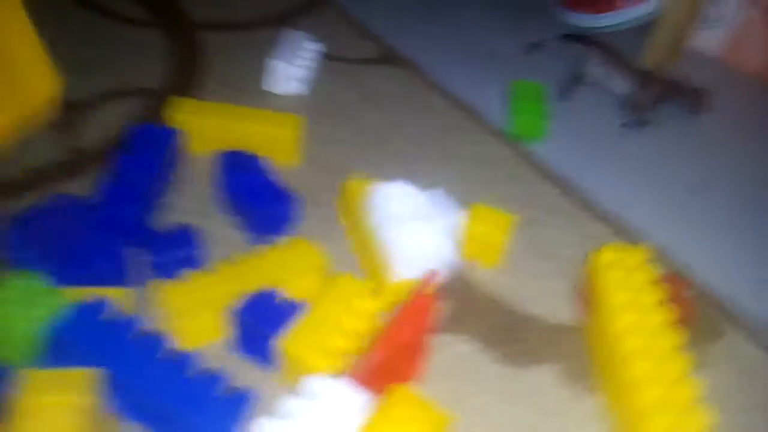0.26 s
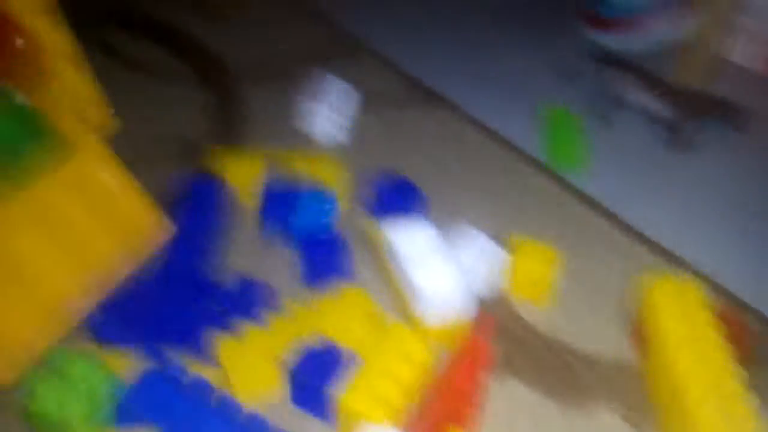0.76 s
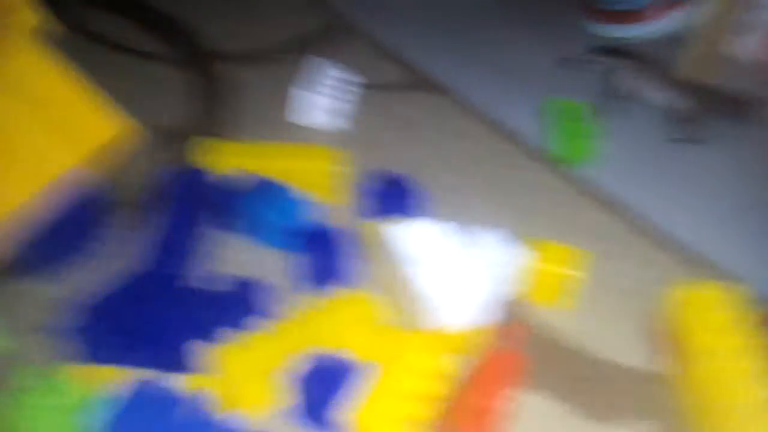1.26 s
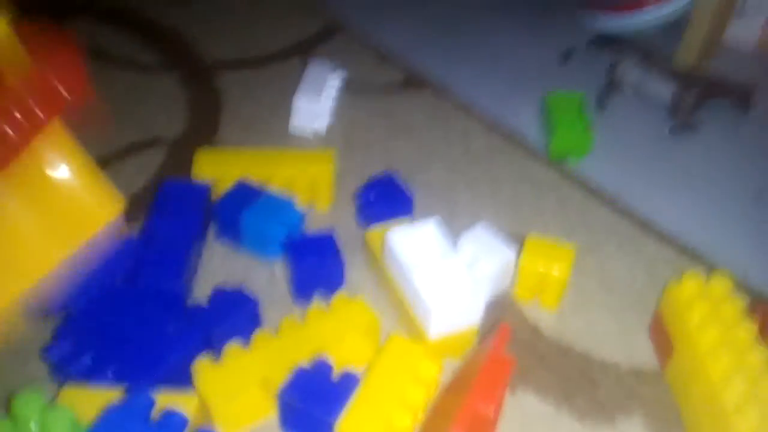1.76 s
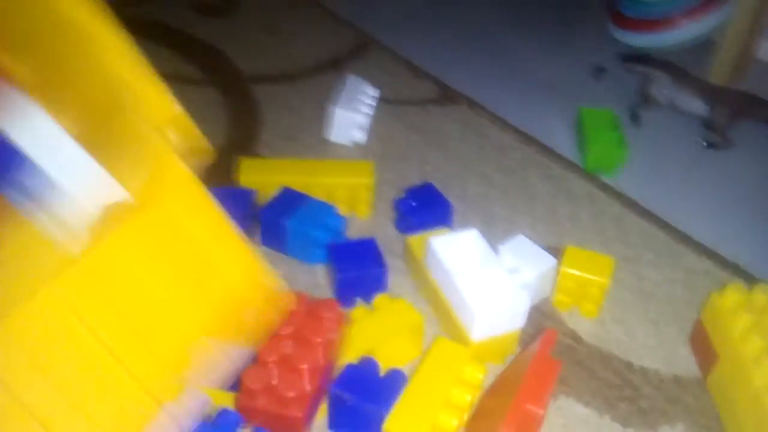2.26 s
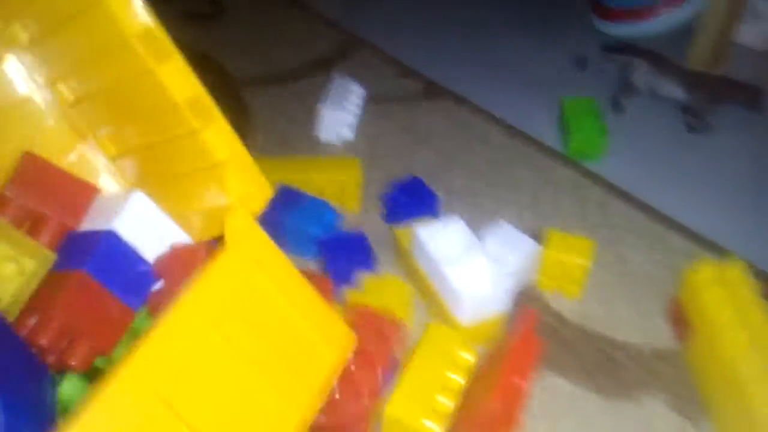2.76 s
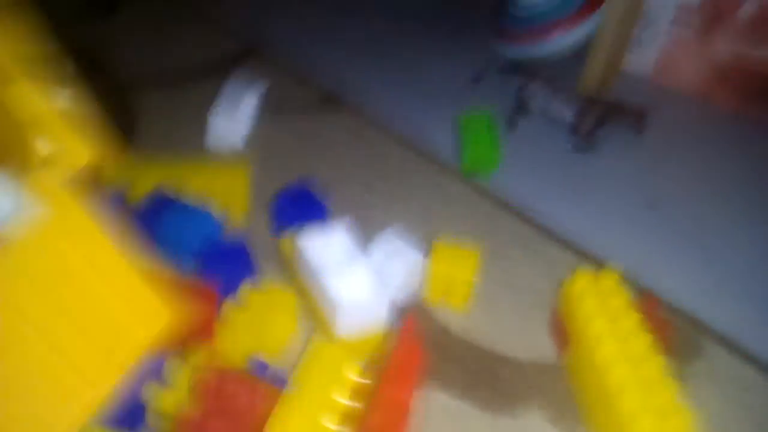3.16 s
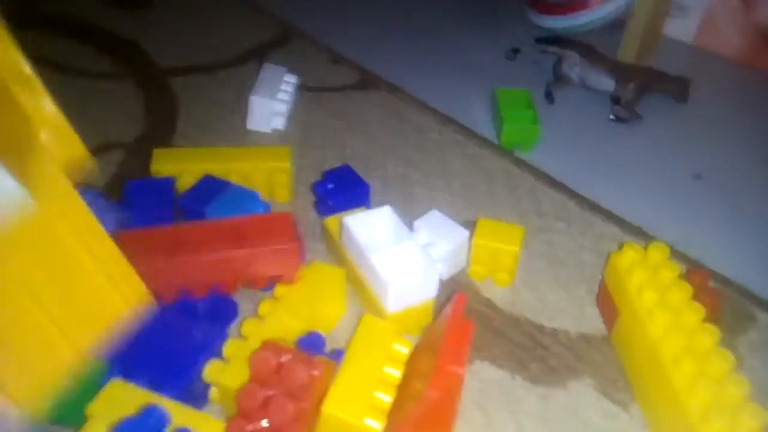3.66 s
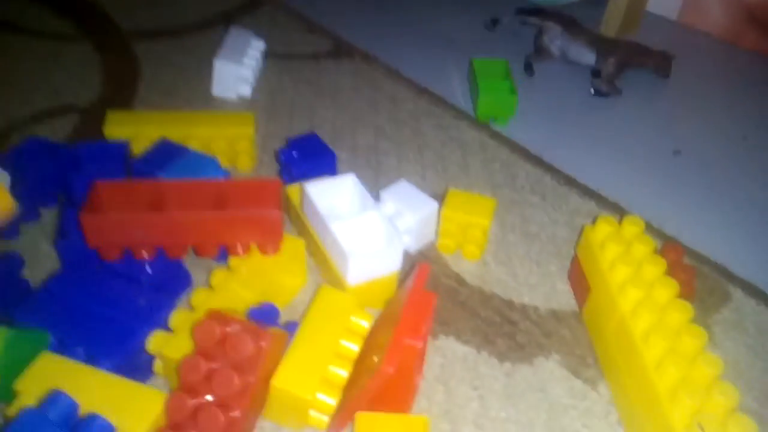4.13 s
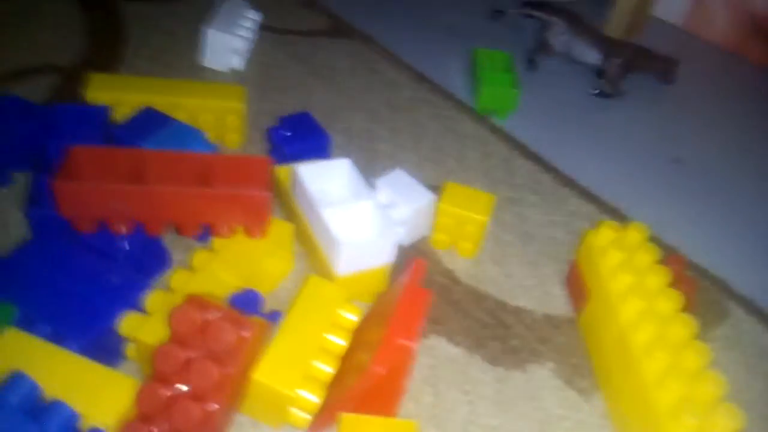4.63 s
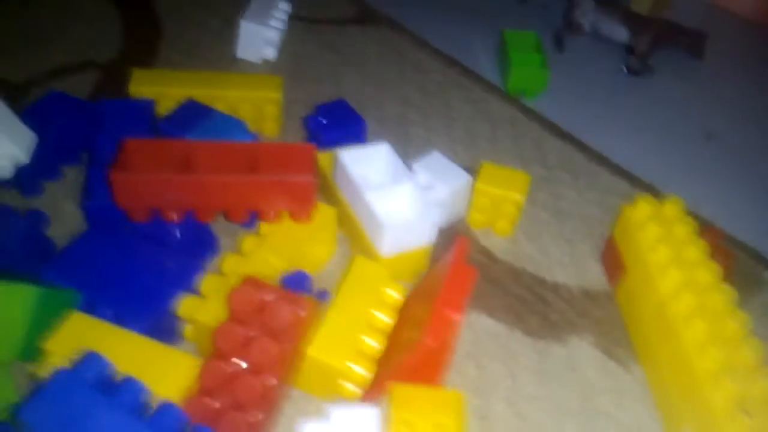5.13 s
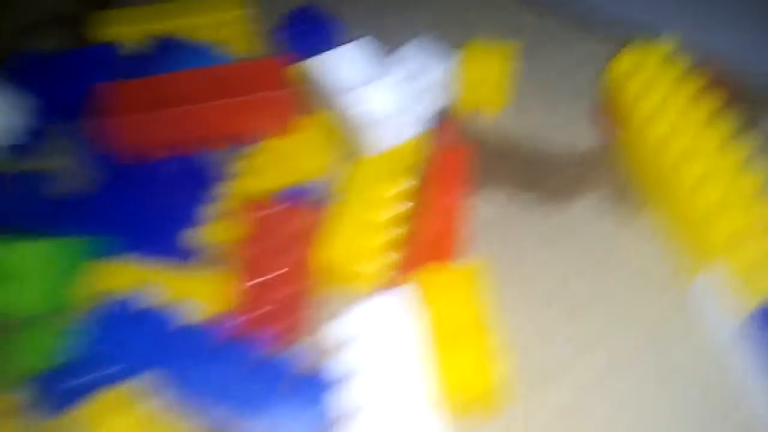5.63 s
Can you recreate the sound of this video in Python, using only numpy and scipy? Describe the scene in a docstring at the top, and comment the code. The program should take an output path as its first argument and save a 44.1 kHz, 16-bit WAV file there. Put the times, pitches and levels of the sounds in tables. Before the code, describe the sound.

A crowded plastic clatter begins at once: blocks knock, skid and chatter against each other in uneven bursts. The bursts grow shorter, then only scattered taps remain, a few hard late clacks, and near quiet over faint air noise. Close, dull-topped, slightly clipped microphone in a small indoor room with a short reverberation.

```python
"""Big hollow plastic building blocks are shaken out of a toy truck's bed onto a heap of blocks on a carpet.
Each blow is a tiny chatter of contacts that excites the damped modes of a thin shell.
Between the blows the heap jostles and slides, as a random train of small contacts; a few last blocks drop singly.
A few knocks ring one deep mode each, over faint steady air noise.
The room is small, and the close microphone overloads on the hardest hits."""
import sys
import numpy as np
from scipy import signal
from scipy.fft import rfft, irfft
from scipy.io import wavfile

SR = 44100
rng = np.random.default_rng(int(sys.argv[2]) if len(sys.argv) > 2 else 0)


def dump(signal):
    """Clip the signal to [-1, 1] and save it as 16-bit WAV at the path in sys.argv[1]."""
    limited = np.clip(np.atleast_2d(signal).T, -1, 1)
    pcm = np.round(limited * 32767).astype(np.int16)
    wavfile.write(sys.argv[1], SR, pcm)


N = 259749

# families of shell modes, of which every block has a few each; levels are relative
# columns: centre_hz, span_octaves, level_db, t60_s
# the hollow body
HOLLOW_BODY_MODES = [(175.8, 0.25, -14.5, 0.053), (337, 0.65, -14.5, 0.028), (503, 0.22, -5.5, 0.057),
                     (710.2, 0.511, -4.5, 0.19), (1095.5, 0.71, -4, 0.086), (1653, 0.48, 4.5, 0.038)]
# the thin walls
THIN_WALL_MODES = [(2128, 0.27, -5.5, 0.036), (2519, 0.18, 0, 0.032), (3046, 0.43, -5, 0.029)]
# the stiff edges
STIFF_EDGE_MODES = [(4203, 0.41, -1, 0.022), (5026, 0.31, 6.5, 0.019), (5805, 0.38, 0.5, 0.014),
                    (8970, 0.79, -5.5, 0.027)]


def from_db(db):
    """Decibels to amplitude gain: 20 dB is a factor of ten."""
    return 10 ** (np.asarray(db) / 20)


def rms_one(x):
    """Normalize the mean power: scale to an rms of 1."""
    return x / np.sqrt(np.mean(x ** 2) + 1e-20)


def seconds(length):
    """Sampled time axis of the given length in seconds."""
    return np.arange(int(length * SR)) / SR


def add(track, s, sound):
    """Superposition: mix a sound into a track at a time in seconds."""
    at = max(int(s * SR), 0)
    track[at:at + len(sound)] += sound[:N - at]


def cut(x, hz, kind, order):
    """Butterworth low- or high-pass, maximally flat in its passband."""
    return signal.sosfilt(signal.butter(order, hz, kind, fs=SR, output="sos"), x)


RING_TIME = seconds(.11)


def air(level_db=-52):
    """Stationary noise: white noise shaped by a spectral density gives the still air of the room."""
    # relative spectral density of the air noise; columns: frequency_hz, density_db
    air_spectrum = [(30, -21), (90, -3.5), (190, 10.5), (400, 1), (1000, -1), (2500, 3), (5300, -10),
                    (9000, -40)]
    hz, db = np.transpose(air_spectrum)
    bins_hz = np.fft.rfftfreq(N, 1 / SR)
    colour = from_db(np.interp(np.log(bins_hz + 1), np.log(hz), db))
    noise = irfft(rfft(rng.standard_normal(N)) * colour, N)
    return from_db(level_db) * rms_one(noise)


def room(x, near_s=0.028, build_s=0.0011):
    """Reverberation: quick echoes off the truck and the floor, and a diffuse tail whose treble dies first."""
    t60_s, treble_t60_s, split_hz = 0.43, 0.26, 1480
    tail_db, echo_db = -8, -27
    t = seconds(.6)
    lows = cut(rng.standard_normal(len(t)), split_hz, "low", order=2) * from_db(-60 * t / t60_s)
    highs = cut(rng.standard_normal(len(t)), split_hz, "high", order=2) * from_db(-60 * t / treble_t60_s)
    build_up = 1 - np.exp(-(t / build_s) ** 2)
    tail = (lows + highs) * build_up
    echoes = rng.standard_normal(len(t)) * t * np.exp(-2 * t / near_s)
    response = from_db(tail_db) * tail / np.linalg.norm(tail)
    response = response + from_db(echo_db) * echoes / np.linalg.norm(echoes)
    return signal.oaconvolve(x, response)[:N]


def knocks():
    """Free decay of single modes: deep, damped notes of the larger hollow parts and the floor."""
    # knocks that set one deep mode ringing; columns: start_s, pitch_hz, level_db, t60_s
    knock_table = [(1.268, 715, -11, 0.15), (4.019, 300, -22.5, 0.047), (4.609, 332, -26.5, 0.068),
                   (4.926, 109, -32, 0.14), (4.93, 766, -11.5, 0.059), (5.27, 1170, -18.5, 0.1)]
    out, t = np.zeros(N), seconds(.25)
    for s, hz, db, t60 in knock_table:
        add(out, s, from_db(db - 60 * t / t60) * np.sin(2 * np.pi * hz * t))
    return out


def shell(families, tuning=1, uneven_db=-0.5, count=7):
    """Modal superposition: one block struck at one spot rings its own pitches and strengths; energy 1."""
    out = 0
    for centre_hz, span, db, t60 in families:
        # one pitch at random in each equal slice of the family's span
        place = (np.arange(count) + rng.random(count)) / count - .5
        hz = np.minimum(tuning * centre_hz * 2 ** (span * place), SR / 2)
        modes = np.sin(np.outer(np.float32(2 * np.pi * hz), np.float32(RING_TIME)))
        strengths = rng.standard_normal(count)
        ring = (strengths @ modes) * from_db(-60 * RING_TIME / t60)
        family_db = db + uneven_db * (2 * rng.random() - 1)
        out = out + from_db(family_db) * rms_one(ring)
    # a small shell radiates little below its lowest modes
    out = cut(out, families[0][0] / 2, "high", order=2)
    return out / np.linalg.norm(out)


def chatter(settle_s, rebound, count=9):
    """Repeated impact: after a first touch, corners and studs meet ever more rarely and weakly."""
    touches = np.zeros(len(RING_TIME))
    late = rng.random(count) ** 2
    at = np.minimum((late * settle_s * SR).astype(int), len(touches) - 1)
    touches[at] = rebound * rng.choice([-1, 1], count) * np.exp(-late)
    touches[0] = 1
    return touches


def clack(touches, levels_db, wall_hz):
    """Impulse response: touches ring body, walls and edges; the block's size sets its wall pitch."""
    usual_wall_hz = 2520
    attack = int(.01 * SR)
    body = shell(HOLLOW_BODY_MODES)
    walls = shell(THIN_WALL_MODES, wall_hz / usual_wall_hz)
    edges = shell(STIFF_EDGE_MODES)
    out = 0
    for db, part in zip(levels_db, (body, walls, edges)):
        ring = signal.fftconvolve(touches, part)
        # the level of each part refers to its attack
        out = out + from_db(db) * ring / np.std(ring[:attack])
    return out


def jostle(times):
    """Power addition of stirring and slides: contact level, share of hollow rumble in it, contact rate."""
    # a jolt sets the blocks sliding for a while; the rumble level is relative to the contacts
    # columns: start_s, length_s, contacts_db, rumble_db, contacts_per_s
    slide_table = [(0.0, .16, -22, -18, 227), (0.234, 0.53, -22, -4, 254), (0.462, 0.19, -20, -11, 400),
                   (0.85, 0.12, -24, -1.5, 300), (1.059, 0.044, -30, -3.5, 176),
                   (1.234, 0.017, -28, 0, 290), (1.296, 0.19, -20, -7, 316), (1.589, .19, -20, -2.5, 326),
                   (1.87, 0.27, -31.5, 1, 360), (2.016, 0.17, -23.5, -4.5, 320),
                   (2.302, 0.29, -18, -6, 322), (2.676, 0.21, -38.5, -2.5, 320),
                   (2.877, 0.14, -26, -2.5, 225), (3.18, 0.069, -31.5, -2, 303),
                   (3.268, 0.093, -21.5, -4, 450), (3.449, 0.21, -29, -4, 253),
                   (3.613, 0.26, -21.5, -8, 320), (3.94, .22, -29, -6.5, 200), (4.246, 0.3, -36.5, -11, 93),
                   (4.595, 0.13, -43, 2.5, 290), (4.935, 0.016, -21.5, 1.5, 490),
                   (5.566, 0.04, -35.5, -5.5, 680)]
    swell_db_per_s, run_out_db_per_s = 449, 221.5
    # between slides the heap stirs faintly, and comes to rest once the bed is empty
    stir_db, stir_rumble_db, stir_per_s = -46, -4, 200
    empty_s, rest_db_per_s = 4.63, 11
    contacts = from_db(stir_db - rest_db_per_s * np.maximum(times - empty_s, 0)) ** 2
    rumble = contacts * from_db(stir_rumble_db) ** 2
    rates = contacts * stir_per_s
    for s, length, db, rumble_db, per_s in slide_table:
        # every slide swells, holds and runs out
        swell_db = swell_db_per_s * np.maximum(s - times, 0)
        run_out_db = run_out_db_per_s * np.maximum(times - s - length, 0)
        power = from_db(db - swell_db - run_out_db) ** 2
        contacts = contacts + power
        rumble = rumble + power * from_db(rumble_db) ** 2
        rates = rates + power * per_s
    # the rate is the power-weighted mean of all that moves
    return np.sqrt(contacts), np.sqrt(rumble / contacts), rates / contacts


def heap(size_db=15, wall_db=1.5, edge_db=-4.0, pitch_spread=0.131, count=40):
    """Shot noise: many small random contacts, each ringing one of the blocks of the shifting heap."""
    tunings = 2 ** (pitch_spread * rng.standard_normal(count))  # spread in octaves
    bodies = [shell(HOLLOW_BODY_MODES) for block in range(count)]
    clacks = []
    for tuning in tunings:
        walls = from_db(wall_db) * shell(THIN_WALL_MODES, tuning)
        clacks.append(walls + from_db(edge_db) * shell(STIFF_EDGE_MODES))
    step_s = .001  # each step has one chance of a contact
    chances = np.arange(0, N / SR, step_s)
    luck, force, late, side = rng.random((len(chances), 4)).T
    owners = rng.integers(0, count, len(chances))
    levels, rumbles, rates = jostle(chances)
    # most contacts are slight, a few are much harder
    sizes = rms_one(from_db(size_db * force ** 2)) * np.sign(side - .5)
    # rarer contacts are stronger, so that the rate leaves the mean power alone
    sizes = sizes * levels * np.sqrt(SR / rates)
    out = np.zeros(N)
    for k in np.flatnonzero(luck < rates * step_s):
        block = owners[k]
        contact = clacks[block] + rumbles[k] * bodies[block]
        add(out, chances[k] + late[k] * step_s, sizes[k] * contact)
    return out


def blows(body_db=-4.0, wall_db=-9.5, edge_db=-3.5, settle_s=.008, rebound=2.1, heft_slope=.35,
          usual_hollow_db=-12, count=3):
    """Impact excitation: each distinct blow and its hop, as direct sound and spill to several sides."""
    # the loudest blows of block on block or bed; levels are relative within each part of the block
    # columns: start_s, wall_level_db, body_level_db, edge_level_db, wall_pitch_hz
    blow_table = [(0.0064, -1, -23.5, -11.5, 2600), (0.031, 1.5, -17.5, -12, 2525),
                  (0.066, -6.5, -25, -15, 2137), (0.0737, -2.5, -27.5, -13, 2640),
                  (0.1259, -1, -26.5, -18, 2530), (0.1624, -4, -29, -20.5, 2690),
                  (0.2163, -5, -20.5, -12, 2660), (0.2907, -6, -16.5, -19, 2860),
                  (0.4086, -5.5, -12.5, -9, 2660), (0.4576, -5.5, -12.5, -12.5, 2360),
                  (0.5944, -8, -13, -24, 2140), (0.6421, -1.5, -15.5, -14, 2740),
                  (0.8051, -5, -21, -18, 2030), (1.2675, 0, -11.5, -10.5, 2220), (1.3203, 1, -15, -5, 2856),
                  (1.4166, -6.5, -16, -17.5, 2215), (1.5273, -3.5, -20.5, -19.5, 2320),
                  (1.7284, -3, -12, -12.5, 2810), (1.763, -1.5, -15, -14, 2280),
                  (1.8416, -4.5, -23, -22.5, 2366), (1.9993, -5.5, -17.5, -12.5, 2490),
                  (2.045, -2.5, -14.5, -7, 2334), (2.2424, -2.5, -12.5, -16, 2870),
                  (2.2551, 0, -14, -4, 2230), (2.4017, -4, -11.5, -9.5, 2480),
                  (2.5586, -0.5, -12.5, -9.5, 3130), (2.9091, -5.5, -19.5, -15.5, 2610),
                  (2.9922, -12.5, -20, -15.5, 2310), (3.251, -2, -19.5, -14, 2550),
                  (3.2621, 1.5, -12, -6, 2810), (3.2958, -5, -19, -12, 2510),
                  (3.5647, -12, -22.5, -11.5, 2460), (3.7558, -7.5, -21, -22, 2450),
                  (3.794, -6, -24.5, -21, 2510), (3.8121, -2, -18, -14, 2730), (3.8423, -2, -19, -11, 2466),
                  (4.0334, -14, -27, -16, 2230), (4.0883, -9.5, -28.5, -15.5, 2530),
                  (4.2162, -6, -30.5, -20.5, 2786), (4.2449, -8.5, -33.5, -35, 2720),
                  (4.2996, -15, -36, -41, 2860), (4.6129, -23, -31.5, -25.5, 2660),
                  (4.6618, -8, -20.5, -15.5, 2405), (4.6712, -8, -25.5, -15, 2820),
                  (4.781, -18.5, -41, -36.5, 2310), (4.9259, -3, -10.5, -6, 2320),
                  (4.9374, -7.5, -16.5, -14, 2750), (5.206, -17.5, -28, -20, 2570),
                  (5.2685, -6.5, -17, -2, 3120), (5.5062, -20, -30.5, -28.5, 2600)]
    hop_s, hop_db = 0.014, -10
    direct, spills = np.zeros(N), np.zeros((count, N))
    for s, wall, body, edge, wall_hz in blow_table:
        # hollow, heavy blows settle slowly and fill the room; light clacks stay short and dry
        heft = from_db(np.clip(heft_slope * (body - wall - usual_hollow_db), -9, 3))
        levels_db = body + body_db, wall + wall_db, edge + edge_db
        add(direct, s, clack(chatter(settle_s * heft, rebound), levels_db, wall_hz))
        # a struck block hops and lands once more; heavy ones hop longer
        landing_s = s + hop_s * heft * rng.uniform(.7, 1.3)
        add(direct, landing_s, from_db(hop_db) * clack(np.ones(1), levels_db, wall_hz))
        # each side of the room hears another mix of the block's modes
        for spill in spills:
            add(spill, s, heft / np.sqrt(count) * clack(np.ones(1), levels_db, wall_hz))
    return direct, spills


def scene(heap_spill_db=-2):
    """Superposition of direct and reverberant sound: blows, jostling and knocks in the room, and its air."""
    direct, spills = blows()
    rest = heap() + knocks()
    blow_reverb = sum(map(room, spills))
    rest_reverb = from_db(heap_spill_db) * room(rest)
    return (direct + rest + blow_reverb + rest_reverb + air())[None]


def record(dry, bass_hz=130, treble_hz=6400, leak_db=-21, top_hz=11000, coupling_hz=70):
    """Band-limiting and overload: little bass, a steep treble fall to a faint shelf, flat clipping."""
    cutoff_hz = 15900
    heard = cut(dry, bass_hz, "high", order=2)
    shelf = from_db(leak_db) * cut(heard, top_hz, "low", order=4)
    heard = cut(heard, treble_hz, "low", order=9) + shelf
    clipped = cut(np.clip(heard, -1, 1), coupling_hz, "high", order=1)
    return signal.sosfilt(signal.ellip(10, .1, 70, cutoff_hz, fs=SR, output="sos"), clipped)


dry = scene()
out = record(dry)
dump(out)
```